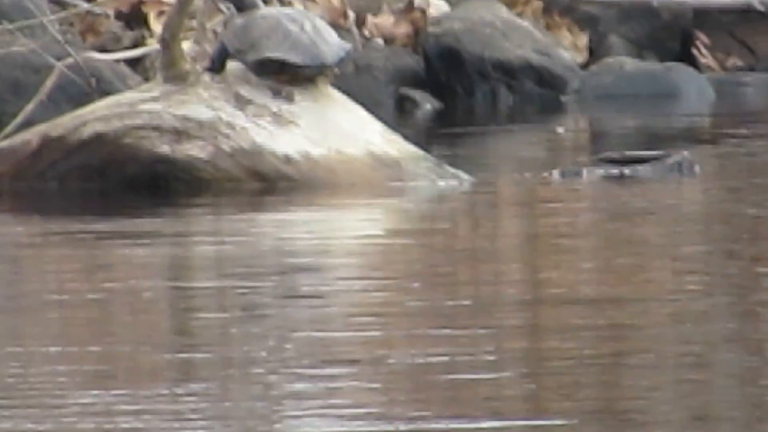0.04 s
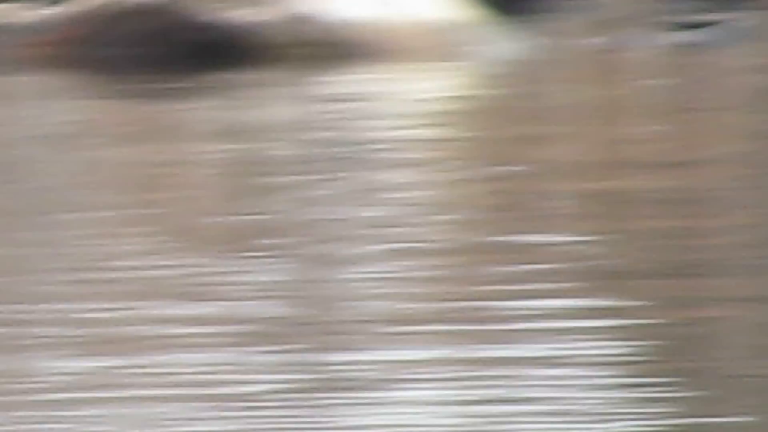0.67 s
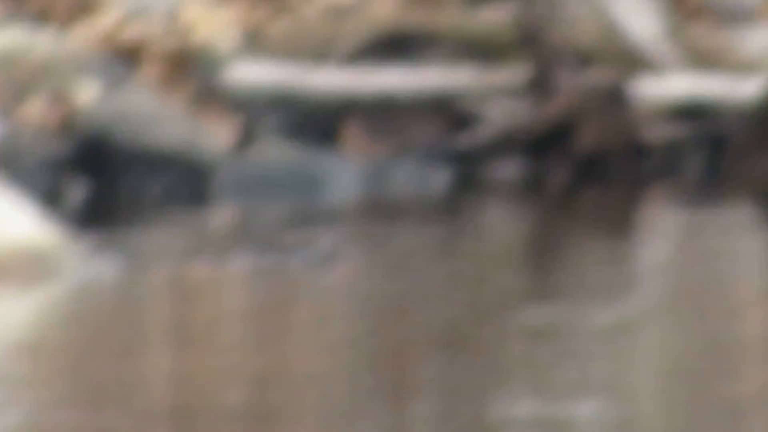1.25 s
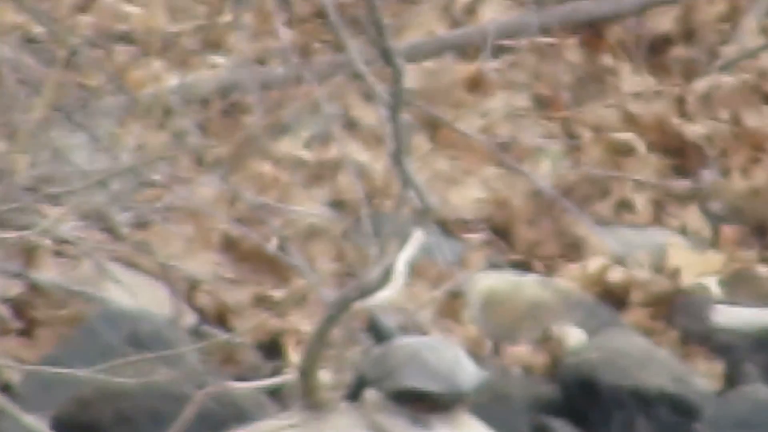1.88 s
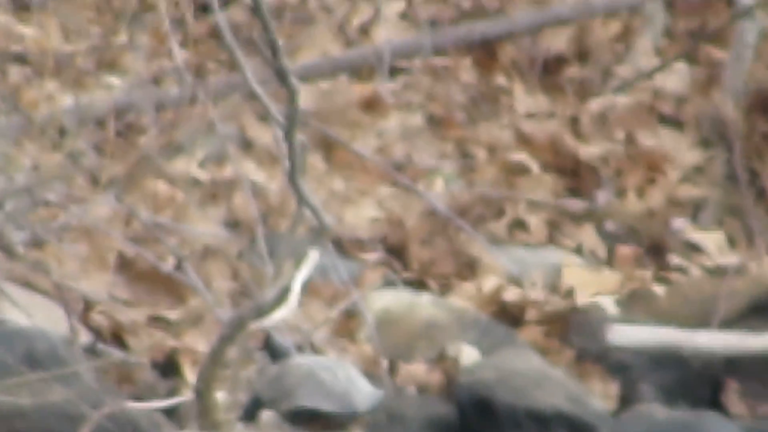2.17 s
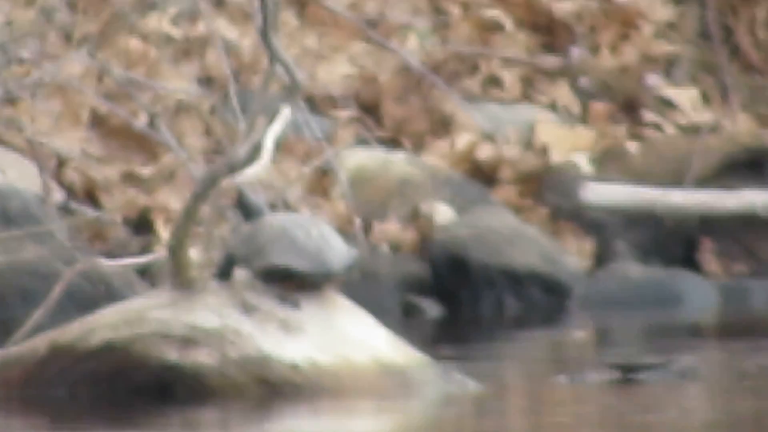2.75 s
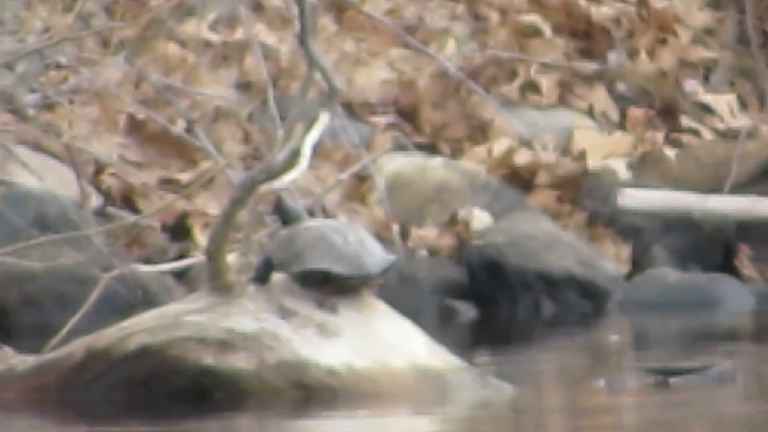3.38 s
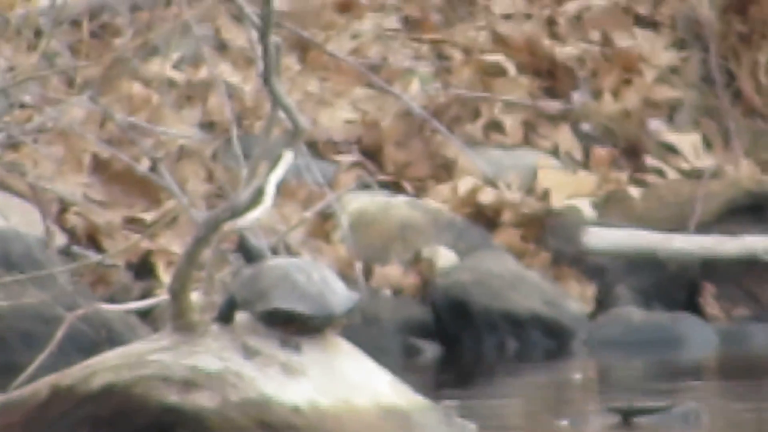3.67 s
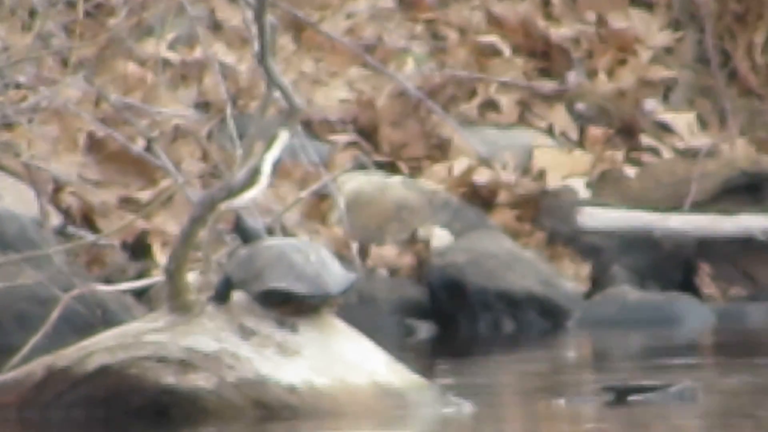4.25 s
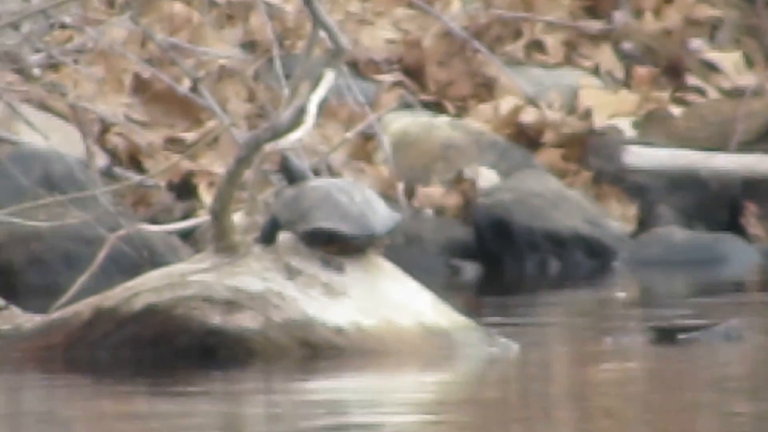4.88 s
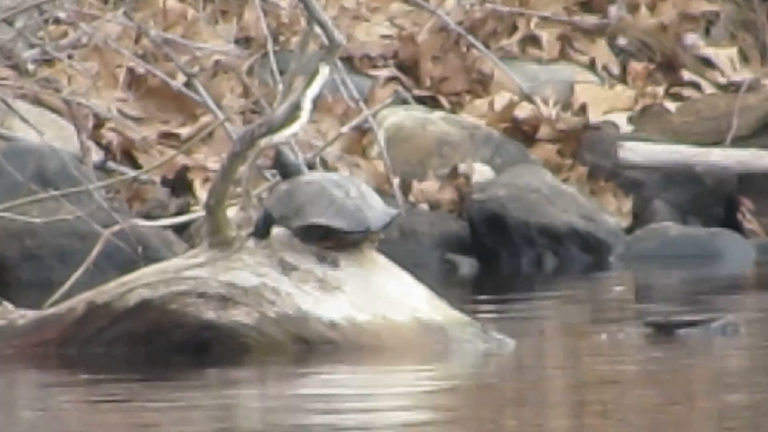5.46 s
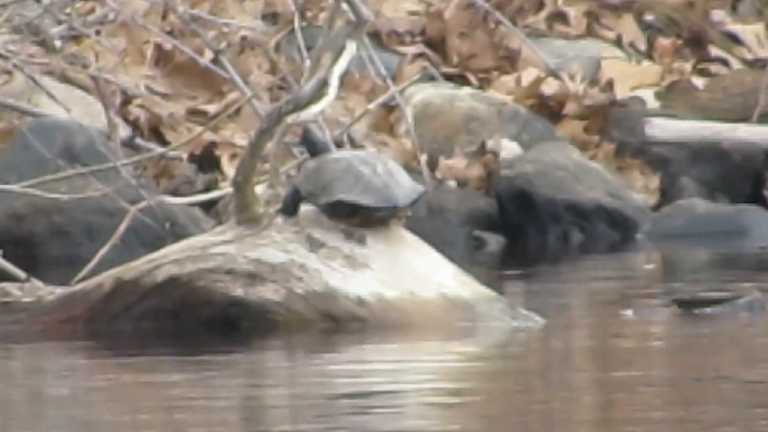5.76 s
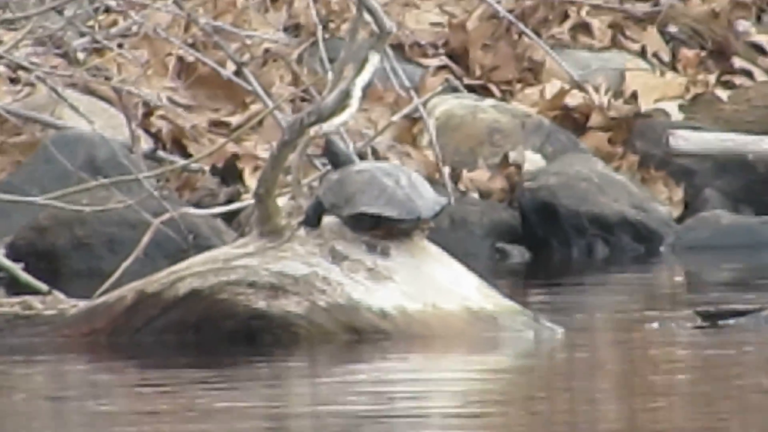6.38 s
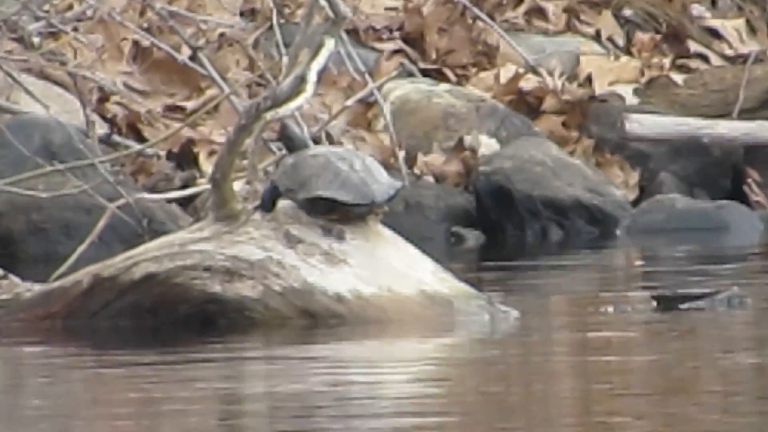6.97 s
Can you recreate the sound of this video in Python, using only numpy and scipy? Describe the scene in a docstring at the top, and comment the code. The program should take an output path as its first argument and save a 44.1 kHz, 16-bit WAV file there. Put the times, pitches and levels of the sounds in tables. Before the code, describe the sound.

Wind rumbles on the microphone, lightly and then strongly, with faint birds, distant crow caws and a brief click.

```python
"""River bank: wind eddies buffet a camera microphone, lightly at first, then in a long gust.
The plastic shell rings with one quick cluster of clicks and with soft finger scuffs.
A far crow caws, small birds chirp and faint tones moan, all scattered by trunks and banks.
Behind them: far traffic, dry leaves, camera hiss and whine. A limiter ducks the hardest peaks."""
import sys
import numpy as np
from scipy import signal
from scipy.fft import rfft, irfft
from scipy.io import wavfile
from scipy.ndimage import uniform_filter1d

SR = 44100
rng = np.random.default_rng(int(sys.argv[2]) if len(sys.argv) > 2 else 0)


def transcribe(signal):
    """Save signal, clipped to [-1, 1], as a 16-bit WAV file at the path in sys.argv[1]."""
    frames = np.atleast_2d(signal).T
    limited = np.clip(frames, -1, 1)
    pcm = np.round(limited * 32767).astype(np.int16)
    wavfile.write(sys.argv[1], SR, pcm)


N = 314433
TIME_S = np.arange(N) / SR
BINS_HZ = np.fft.rfftfreq(N, 1 / SR)

# Table levels are relative; each source applies its own gain.
# wind strength: breeze, lull, gust (time [s], level [dB])
WIND_LEVEL = [(.06, -36.5), (.52, -29.5), (.68, -39), (.88, -27.5), (1.9, -34), (2.72, -31.5),
              (2.92, -32.5), (3.33, -31), (3.62, -39), (3.97, -34), (4.13, -35), (4.42, -25.5),
              (4.75, -22.5), (4.99, -24), (5.08, -19.5), (5.15, -14.5), (5.33, -19.5), (5.58, -16),
              (5.75, -17), (5.95, -14.5), (6.1, -17), (6.36, -19.5), (6.56, -16.5), (6.83, -22),
              (6.96, -17.5), (7.05, -20.5), (7.13, -18.5)]
# rumble against the rest of the wind (time [s], level [dB])
RUMBLE_LEVEL = [(.06, -2.5), (1.0, 3.5), (3.4, 3), (4.5, 0.5), (5.15, 2), (6.0, 2), (6.5, 2.5), (7.13, 5)]
# slow turbulence at wind level -20 dB (frequency [Hz], density [dB])
RUMBLE_SPECTRUM = [(15, -6), (35, -13), (65, 3), (130, 1.5), (220, -8.5), (330, -17.5), (500, -21.5),
                   (900, -59), (2000, -94)]
# small eddy at wind level -20 dB (frequency [Hz], density [dB])
EDDY_SPECTRUM = [(20, -55), (70, -8.5), (150, -2), (270, -3), (400, -8), (600, -18.5), (900, -41),
                 (2000, -83)]
# large eddies (time [s], level [dB], pitch [Hz])
BUFFETS = [(.357, -7.5, 218), (.417, -13.5, 180), (.548, -14.5, 135), (.916, -5.5, 189), (.981, -12, 180),
           (1.023, -7.5, 119), (1.105, -14, 170), (1.145, -16, 130), (1.192, -13, 105), (1.256, -8.5, 237),
           (1.338, -13.5, 200), (1.473, -10.5, 149), (1.484, -13, 145), (1.539, -15, 124), (1.61, -9, 165),
           (1.624, -14, 185), (1.771, -13, 180), (1.838, -15.5, 180), (1.977, -17, 150),
           (2.005, -17.5, 155), (2.149, -16, 185), (2.413, -10, 222), (2.598, -14, 247), (2.611, -16, 145),
           (2.69, -9, 162), (2.743, -13, 190), (2.752, -17.5, 110), (2.763, -14.5, 150), (3.123, -10, 227),
           (3.307, -16.5, 145), (3.331, -17.5, 150), (3.352, -19, 175), (3.994, -16.5, 149),
           (4.008, -12.5, 152), (4.183, -12, 180), (4.275, -11.5, 176), (4.293, -7, 174), (4.386, -13, 160),
           (4.442, -12, 270), (4.485, -8, 230), (4.637, -12, 130), (4.78, -7, 185), (4.827, -8.5, 231),
           (5.032, -7.5, 220), (5.129, -5, 363), (5.143, -6, 230), (5.155, -7, 255), (5.167, -5, 350),
           (5.178, -3.5, 200), (5.2, 0.5, 264), (5.416, -6, 210), (5.471, -4, 171), (5.477, -2, 210),
           (5.5148, 2.5, 235), (5.553, -3.5, 215), (5.628, -3, 227), (5.661, -2, 230), (5.684, -5.5, 240),
           (5.805, -5, 165), (5.843, 0, 305), (5.866, -2.5, 373), (5.909, -6, 212), (5.948, -6, 350),
           (5.98, -5, 382), (6.007, -2.5, 225), (6.078, -10, 290), (6.185, -4, 252), (6.201, -4, 196),
           (6.357, -2.5, 262), (6.47, -5.5, 190), (6.605, -6, 205), (6.656, -5.5, 210), (6.709, -8, 220),
           (6.952, -3, 243), (6.959, -4, 140), (6.973, -8, 149), (7.122, -4, 250)]
# shell clicks (time [s], level [dB], t60 [s], tilt [dB/octave], resonance [Hz])
CLICKS = [(.4078, -31, 0.0084, 3, 1900), (.4153, -46, .01, -1, 2100), (.4505, -42, 0.042, -3, 2900),
          (.4712, -49, 0.02, 0, 3300)]
# plastic shell (frequency [Hz], density [dB])
SHELL_SPECTRUM = [(500, -18), (1900, 12), (2800, 3), (5000, -0.5), (9000, 3), (12500, -3), (15000, -9)]
# finger strokes (time [s], length [s], level [dB])
SCUFFS = [(0.182, .05, -67), (.735, .1, -63.5), (2.82, .72, -69), (6.12, 0.57, -70)]
# high shell modes (frequency [Hz], level [dB], t60 [s])
SHELL_MODES = [(9300, 3, .005), (10600, -1, .004), (13000, -9, .005)]
# crow calls (time [s], length [s], level [dB])
CAWS = [(5.895, 0.13, -39), (6.386, 0.16, -38.5), (6.6, 0.07, -43), (6.914, 0.15, -39)]
# crow voice (harmonic number, level [dB])
CAW_HARMONICS = [(1, -11), (2, 0), (3, -17)]
# thin peeps (time [s], length [s], mid pitch [Hz], level [dB])
PEEPS = [(0.413, 0.074, 7370, -56), (.565, 0.037, 6080, -57.5), (4.015, 0.061, 7000, -58.5),
         (4.136, 0.052, 6300, -59.5), (4.248, .036, 6000, -58)]
# bird whistles (time [s], length [s], start [Hz], middle [Hz], end [Hz], level [dB])
WHISTLES = [(1.0, 0.092, 3560, 3460, 3220, -61), (1.27, 0.026, 8350, 7520, 7540, -40.5),
            (3.636, .032, 3950, 3650, 3420, -58), (3.712, 0.073, 3900, 4500, 4950, -57.5),
            (3.838, 0.197, 3810, 3740, 3720, -61.5), (3.913, 0.15, 4700, 4300, 4230, -59.5)]
# two rising notes (offset [s], length [s], start [Hz], middle [Hz], end [Hz], level [dB])
SONG_NOTES = [(0, 0.066, 4130, 4510, 4840, 0.5), (0.097, 0.14, 3716, 3785, 4420, 3)]
# song repeats (time [s], level [dB], pitch shift [Hz])
SONG_REPEATS = [(1.255, -62.5, -90), (5.13, -63.5, 21), (6.773, -60.5, 82)]
# far moans (time [s], length [s], start [Hz], middle [Hz], end [Hz], level [dB])
MOANS = [(1.03, .52, 1090, 1270, 1360, -53), (2.88, .5, 1290, 1250, 1230, -54)]
# far traffic (frequency [Hz], density [dB])
TRAFFIC_SPECTRUM = [(20, -5), (80, 4), (200, -4.5), (330, -2.5), (480, -7.5), (600, 1), (680, -1), (735, 5),
                    (820, -0.5), (1250, -2), (1600, -8.5), (2300, -18.5), (3300, -22.5), (7000, -50)]
# left-right likeness of the traffic (frequency [Hz], coherence [0..1])
TRAFFIC_COHERENCE = [(100, 0.97), (500, 0.15), (750, 0.4), (1250, 0.91), (2000, 0.33), (3500, 0.14)]
# leaf rustle (time [s], level [dB])
LEAF_LEVEL = [(0, -60), (1.4, -59.5), (2.7, -61.5), (3.15, -55), (3.6, -59.5), (4.5, -59.5), (5.8, -62),
              (6.4, -53), (6.9, -56.5), (7.13, -56)]
# dry leaves and twigs (frequency [Hz], density [dB])
LEAF_SPECTRUM = [(600, -22), (1500, 11), (2300, 3.5), (3300, -13), (6000, -16), (12000, -23), (16000, -41)]
# microphone hiss (frequency [Hz], density [dB])
HISS_SPECTRUM = [(100, -14), (2800, 2.5), (3650, 11), (3950, -10.5), (4200, 3), (6000, 3), (7550, 1),
                 (7950, -7), (8200, -1), (11200, -3.5), (13500, -10), (15000, -30)]
# camera whine (frequency [Hz], level [dB])
WHINE_TONES = [(7504, -80), (7612, -86), (13485, -95)]


def amp(db):
    """dB to gain."""
    return 10 ** (np.asarray(db) / 20)


def unit(x):
    """Scale to rms 1."""
    return x / np.sqrt(np.mean(x ** 2) + 1e-20)


def over_time(rows):
    """Interpolate (time [s], value) rows."""
    return np.interp(TIME_S, *np.transpose(rows))


def over_bins(rows):
    """Interpolate (frequency [Hz], value) rows on a log axis."""
    hz, value = np.transpose(rows)
    return np.interp(np.log(BINS_HZ + 1), np.log(np.sort(hz) + 1), value)


def colour(x, spectrum):
    """Filter by a spectrum; rms 1."""
    return unit(irfft(rfft(x) * amp(over_bins(spectrum)), N))


def drift(rate_hz, size=N):
    """Random knots at rate_hz, joined linearly."""
    knots = rng.standard_normal(N // 8)
    return np.interp(np.arange(size) / SR * rate_hz, np.arange(len(knots)), knots)


def add(mix, at_s, sound):
    """Mix in place."""
    part = mix[..., max(round(at_s * SR), 0):][..., :sound.shape[-1]]
    part += sound[..., :part.shape[-1]]


def stereo_noise(spectrum, coherence):
    """Coloured noise, partly coherent channels; rms 1."""
    left, other = rfft(rng.standard_normal((2, N)))
    right = coherence * left + np.sqrt(1 - coherence ** 2) * other
    return unit(irfft(np.array([left, right]) * amp(over_bins(spectrum)), N))


def pan(left_db):
    """Channel gains for a left-minus-right level."""
    return amp(np.array([[left_db], [-left_db]]) / 2)


def wind(rumble_db=-3.0, eddy_db=-3.5, base_eddies_per_s=150, in_phase_gain=.14):
    """Turbulence carried past the ports: faster is louder and higher."""
    level_db = over_time(WIND_LEVEL)
    speed_ratio = amp(.3 * (level_db + 20))
    travel = np.cumsum(speed_ratio) % N
    rumble_gain = amp(rumble_db + over_time(RUMBLE_LEVEL))
    flows = []
    for _ in range(2):
        size_db = 3.5 * np.minimum(rng.exponential(1, N), 2.4) + 1.8 * drift(24)  # uneven, clumped
        kicks = amp(size_db) * rng.choice([-1, 1], N) * (rng.random(N) < base_eddies_per_s / SR)
        eddies = signal.hilbert(colour(kicks, EDDY_SPECTRUM)).imag  # each swings both ways
        rumble = colour(rng.standard_normal(N), RUMBLE_SPECTRUM)
        eddies, rumble = (np.interp(travel, np.arange(N), part) for part in (eddies, rumble))
        flows.append(amp(eddy_db) * eddies * pan(3.05) + rumble_gain * rumble * pan(-1.57))
    # pressure between the close ports drives the channels in antiphase
    pressure = amp(level_db) * (flows[0] * [[1], [-1]] + in_phase_gain * flows[1])
    strength = uniform_filter1d(abs(pressure[0]), size=240)
    return pressure / np.hypot(1, strength / .5)  # strongest eddies level off


def buffets(flow, width_cycles=.27, lean_cycles=.11, wake_db=-11.5, wake_s=.0089):
    """Large eddies sweep the flow aside: push, sharper pull, weaker eddy in the wake."""
    pulses, swept = np.zeros((2, N))
    t = np.arange(-SR // 16, SR // 16) / SR
    for at_s, db, hz in BUFFETS:
        start_s = at_s + t[0]
        envelope = 1 / np.cosh(hz * t / width_cycles)
        swing = -np.sin(2 * np.pi * (hz * t + lean_cycles * rng.uniform(.73, 1.4))) * envelope
        add(pulses, start_s, amp(db) * swing)
        add(pulses, start_s + wake_s * rng.uniform(.45, 2.015), amp(db + wake_db) * swing)
        add(swept, start_s, np.sqrt(envelope))
    right = -.78 * pulses / np.hypot(1, pulses / 1.3)  # sheltered port: inverted, compressed
    return flow * (1 - .65 * np.minimum(swept, 1)) + np.array([1.02 * pulses, right])


def clicks(ring_db=5.0, ring_octaves=.3):
    """Dry ticks in the plastic shell, one resonance each, nearer the right port."""
    out, t = np.zeros((2, N)), TIME_S[:4096]
    hz = np.fft.rfftfreq(len(t), 1 / SR) + 1
    octaves = np.log2(hz / 5000 + .1)
    shell = stereo_noise(SHELL_SPECTRUM, coherence=.12)
    for k, (at_s, db, t60_s, db_per_octave, ring_hz) in enumerate(CLICKS):
        resonance_db = ring_db * np.exp(-(np.log2(hz / ring_hz) / ring_octaves) ** 2)
        burst = shell[:, k * len(t):(k + 1) * len(t)]
        ring = unit(irfft(rfft(burst) * amp(db_per_octave * octaves + resonance_db)))
        add(out, at_s, ring * amp(db - 60 * t / t60_s))
    return out * pan(-4.5)


def scuffs(slips_per_s=900, clump_db=4.0):
    """A finger creeps over the shell: clumped micro-slips ring its high modes."""
    stroke, t, modes = np.zeros(N), TIME_S[:512], np.zeros((2, N))
    for at_s, length_s, db in SCUFFS:
        add(stroke, at_s, amp(db) * signal.windows.tukey(round(length_s * SR), .7))
    for hz, db, t60_s in SHELL_MODES:
        slips = rng.standard_normal((2, N)) * (rng.random(N) < slips_per_s / SR)
        slips *= amp(clump_db * drift(45))
        ring = np.sin(2 * np.pi * hz * t) * amp(-60 * t / t60_s)
        modes += amp(db) * unit(signal.oaconvolve(slips, ring[None], axes=1)[:, :N])
    widened = unit(modes - .4 * modes[::-1])
    return stroke * widened * pan(-2.7)


def glides(notes, jitter, jitter_hz, rasp):
    """Tones arching through three pitches; jitter shakes pitch, rasp shakes amplitude."""
    out = np.zeros(N)
    for at_s, length_s, start_hz, middle_hz, end_hz, db in notes:
        size = round(length_s * SR)
        arch = np.polyfit([0, .5, 1], [start_hz, middle_hz, end_hz], 2)
        hz = np.polyval(arch, np.linspace(0, 1, size)) * (1 + jitter * drift(jitter_hz, size))
        tone = np.sin(2 * np.pi * np.cumsum(hz) / SR) * (1 + rasp * drift(jitter_hz, size))
        add(out, at_s, amp(db) * unit(tone) * signal.windows.tukey(size, .6))
    return out


def woods(x, t60_s, wet_db):
    """Trunks and banks scatter a far sound into a dull stereo tail."""
    taps = rng.standard_normal((2, SR)) * (rng.random((2, SR)) < .05)
    taps *= amp(-60 * TIME_S[:SR] / t60_s)
    taps /= np.linalg.norm(taps, axis=1, keepdims=True)
    taps = signal.lfilter(*signal.butter(2, 5500, fs=SR), taps)
    return x + amp(wet_db) * signal.fftconvolve(x[None], taps, axes=1)[:, :N]


def crow(low_hz=500, top_hz=700, gain_db=-5.5):
    """Hoarse caws: three harmonics arch up and back."""
    notes = [(at_s, length_s, k * low_hz, k * top_hz, k * low_hz, db + harmonic_db)
             for at_s, length_s, db in CAWS for k, harmonic_db in CAW_HARMONICS]
    voice = glides(notes, jitter=.034, jitter_hz=380, rasp=.75)
    return amp(gain_db) * woods(voice, t60_s=.85, wet_db=-3)


def chirps(gain_db=-5.5):
    """Nearer birds: arched peeps and gliding whistles."""
    peeps = [(at_s, length_s, .86 * hz, hz, .93 * hz, db) for at_s, length_s, hz, db in PEEPS]
    voice = glides(peeps + WHISTLES, jitter=.009, jitter_hz=400, rasp=.45)
    return amp(gain_db) * woods(voice, t60_s=.45, wet_db=0)


def birdsong(gain_db=-5.5):
    """One bird repeats two upslurs, shifted in pitch each time."""
    notes = [(at_s + offset_s, length_s, *np.add(pitches_hz, shift_hz), db + note_db)
             for at_s, db, shift_hz in SONG_REPEATS
             for offset_s, length_s, *pitches_hz, note_db in SONG_NOTES]
    voice = glides(notes, jitter=.011, jitter_hz=500, rasp=.5)
    return amp(gain_db) * woods(voice, t60_s=.65, wet_db=1)


def moans(gain_db=-2.0):
    """Faint wavering tones from across the water."""
    voice = glides(MOANS, jitter=.0218, jitter_hz=110.3, rasp=.3)
    return amp(gain_db) * woods(voice, t60_s=.67, wet_db=0)


def traffic(start_db=-44, fade_db_per_s=.19):
    """Far traffic murmur, slowly receding."""
    murmur = stereo_noise(TRAFFIC_SPECTRUM, over_bins(TRAFFIC_COHERENCE))
    return murmur * amp(start_db - fade_db_per_s * TIME_S + .5 * drift(8.2))


def leaves(flutter_db=1.5):
    """Breeze stirs dry leaves and twigs."""
    rustle = stereo_noise(LEAF_SPECTRUM, coherence=.55)
    return rustle * amp(over_time(LEAF_LEVEL) + flutter_db * drift(25))


def camera_noise(hiss_db=-61.0, wander_hz=22):
    """Thin camera whine over microphone hiss."""
    whine = np.zeros(N)
    for hz, db in WHINE_TONES:
        cycles = np.cumsum(hz + wander_hz * drift(60)) / SR
        whine += amp(db) * unit(np.sin(2 * np.pi * cycles))
    return whine + amp(hiss_db) * stereo_noise(HISS_SPECTRUM, coherence=.046)


def scene():
    """Stereo sum at the microphone."""
    gusts = buffets(wind())
    background = (traffic() + leaves()) * pan(1.4) + camera_noise()
    calls = birdsong() + chirps() + crow() + moans()
    return gusts + clicks() + scuffs() + calls + background


def record(dry, ceiling_db=-.3, step_db=.45, recovery_db_per_s=2.0, mute_s=.057, cutoff_hz=14850):
    """15 Hz low cut, limiter (instant steps down, slow recovery), muted start, low-pass."""
    dry = signal.sosfiltfilt(signal.butter(2, 15, "high", fs=SR, output="sos"), dry)
    over_db = np.maximum(20 * np.log10(abs(dry).max(0) + 1e-9) - ceiling_db, 0)
    over_db = np.ceil(over_db / step_db) * step_db
    recovery_db = recovery_db_per_s * TIME_S
    cut_db = np.maximum.accumulate(over_db + recovery_db) - recovery_db
    limited = dry * amp(-cut_db) * (TIME_S > mute_s)
    lowpass = signal.firwin(255, cutoff_hz, window=("kaiser", 8), fs=SR)
    return signal.oaconvolve(limited, lowpass[None], "same")


dry = scene()
out = record(dry)
transcribe(out)
```